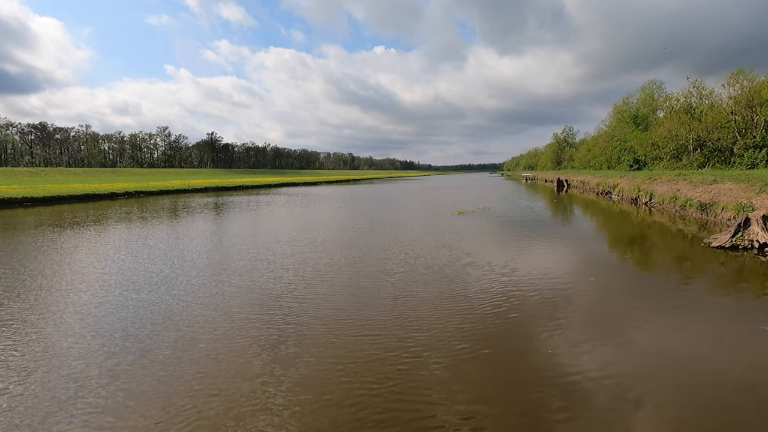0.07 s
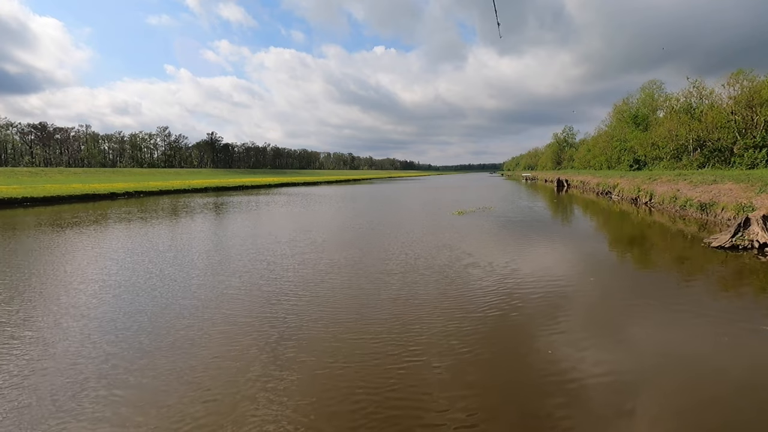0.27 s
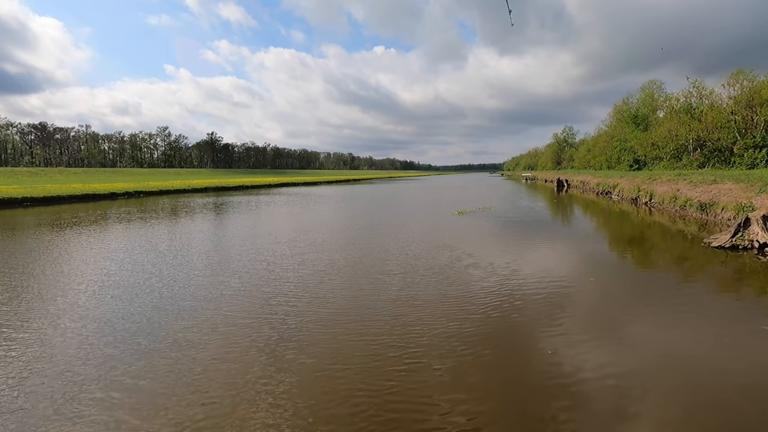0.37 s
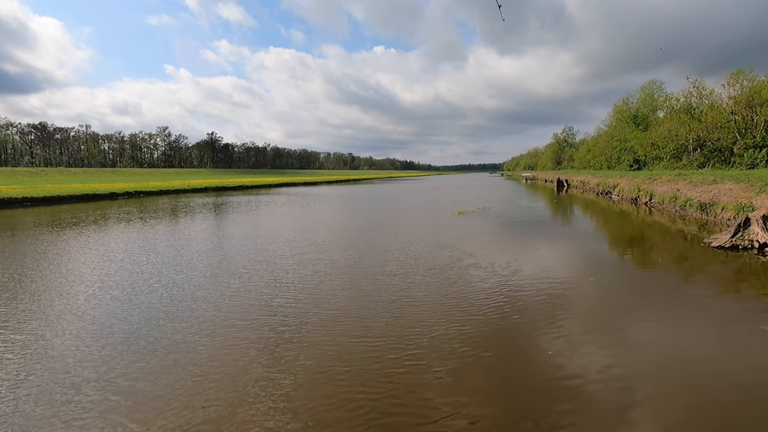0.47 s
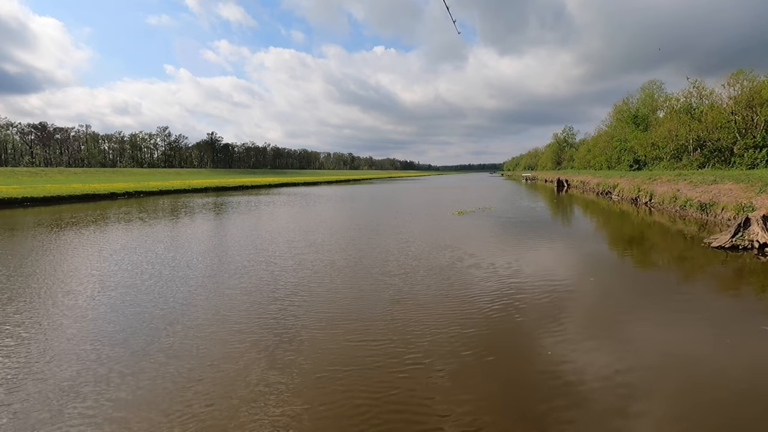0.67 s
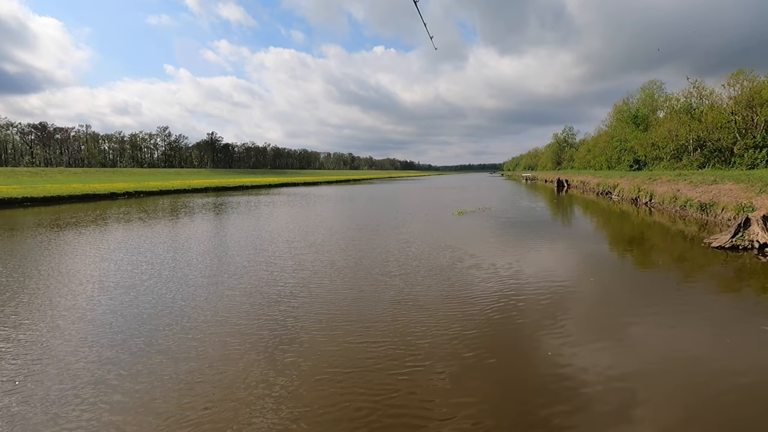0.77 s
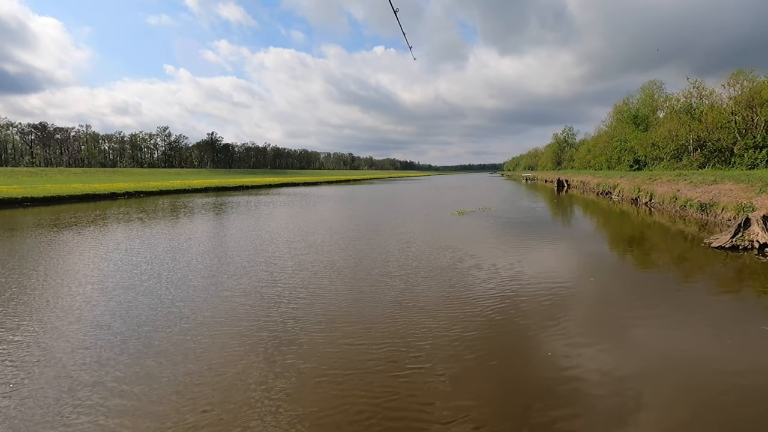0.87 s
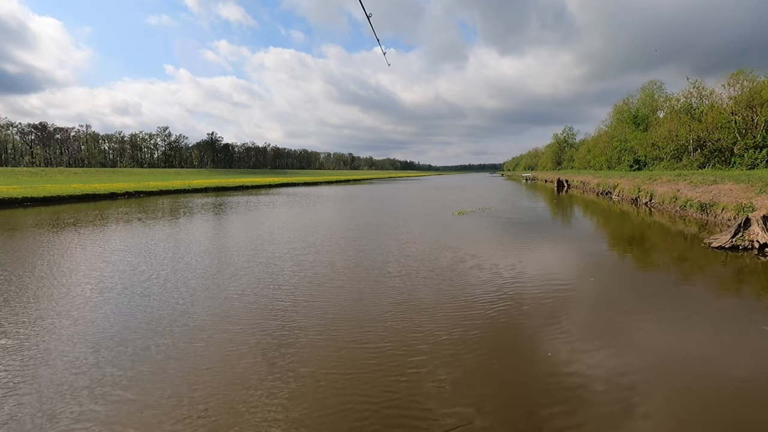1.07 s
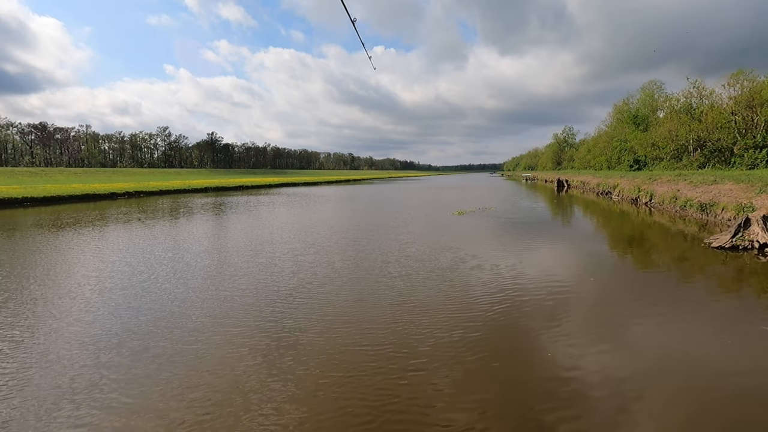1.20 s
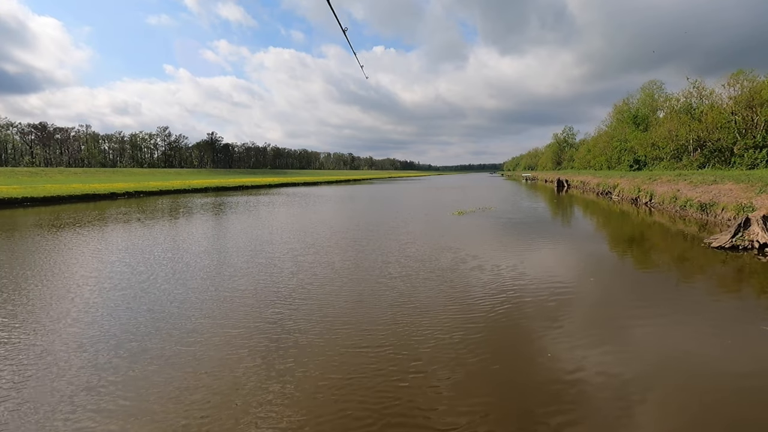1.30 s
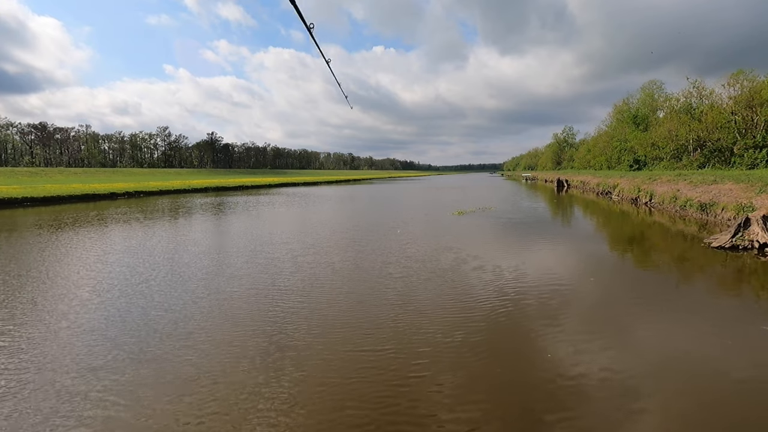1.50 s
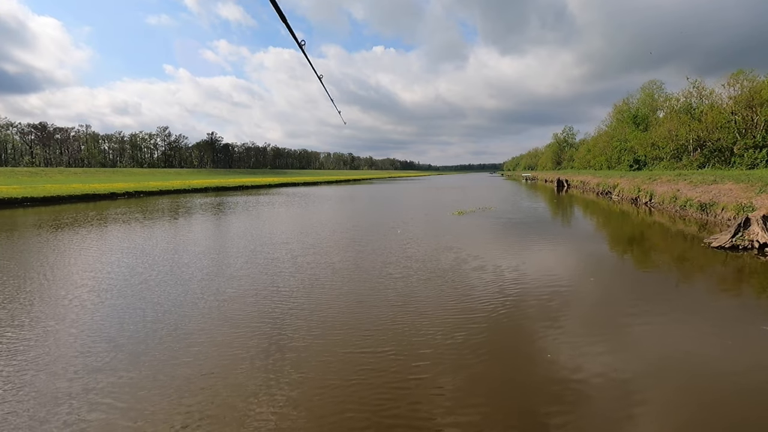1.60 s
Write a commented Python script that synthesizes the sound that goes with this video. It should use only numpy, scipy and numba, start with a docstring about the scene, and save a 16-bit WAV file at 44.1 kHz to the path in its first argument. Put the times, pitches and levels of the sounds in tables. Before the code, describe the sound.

A fishing rod is cast with a quick whoosh, sharp reel clicks and line rattling out, outdoors.

```python
"""By a calm river, a spinning rod is cast close to a body-worn microphone with two ports.
The rod whooshes as noise and tones that follow its speed; the line snaps free in sharp clicks that ring the reel,
then rattles through the guides as streams of small knocks, ever more softly. The arm stops with a dull thump and
a rustle of filtered noise. Water laps as noise and tiny sine bubbles, a far bird whistles in gliding sines,
and a light wind rumbles as low noise under a faint hiss of open air."""
import sys
import numpy as np
from scipy import signal
from scipy.fft import rfft, irfft
from scipy.io import wavfile
from numba import njit

SR = 44100
rng = np.random.default_rng(int(sys.argv[2]) if len(sys.argv) > 2 else 0)


def wrap_up_sound(samples):
    """Save the sound to the file named by the first command line argument, as 16-bit audio."""
    columns = np.atleast_2d(samples).T
    # keep every value between -1 and 1, then stretch to whole-number steps
    tamed = np.clip(columns, -1, 1)
    steps = np.round(tamed * 32767).astype(np.int16)
    wavfile.write(sys.argv[1], SR, steps)


N = 72765
T = np.arange(N) / SR  # time of each sample in seconds

# Hiss of open air. Each row: frequency in Hz, relative level in dB.
AIR_COLOUR = [(100, -5), (400, -7.5), (650, -7.5), (1050, -7.5), (1600, -12.5), (2400, -11.5),
              (3200, -22.5), (4500, -24), (6000, -12), (7200, -30), (8500, -13), (10000, -33), (12200, -30),
              (14000, -53)]
AIR_DB = -56.5
# Rumble of wind. Each row: frequency in Hz, relative level in dB.
WIND_COLOUR = [(10, -12.5), (28, 3.5), (50, -3), (75, -9), (110, -14), (165, -14.5), (250, -23.5),
               (400, -35), (700, -58), (4000, -82)]
# Rise and fall of the wind. Each row: time in seconds, level in dB.
WIND_GUSTS = [(0, -50), (.06, -43.5), (.2, -45.5), (.29, -45), (.38, -52.5), (.5, -46.5), (.57, -49.5),
              (.74, -46), (.8, -53.5), (.95, -49), (1.08, -57), (1.2, -58), (1.3, -48), (1.42, -63),
              (1.57, -51)]

# Whistles of a far bird. Each row: start in seconds, length in seconds,
# pitch at the start, middle and end in Hz, level in dB.
BIRD_WHISTLES = [(.945, .085, 1900, 2280, 2600, -57), (1.092, .073, 2900, 2960, 3150, -55.5),
                 (1.52, .098, 2350, 1990, 2750, -56)]

# Single bubbles at the bank. Each row: start in seconds, pitch in Hz, level in dB, fading time in seconds,
# climb of the pitch during one fading time (as a share of the pitch).
BANK_BUBBLES = [(0.47, 614.5, -43, 0.0057, 0.049), (1.123, 590, -47, 0.011, 0.01),
                (1.146, 570, -50, 0.012, 0), (1.197, 1053, -49.5, .009, .17),
                (1.229, 678, -47, 0.013, 0.14), (1.242, 940, -42.5, 0.008, 0.09),
                (1.256, 1007, -48, 0.011, 0.034), (1.279, 1506, -46.5, 0.005, 0.069),
                (1.316, 1200, -53, 0.0094, .06), (1.392, 545, -42.5, 0.0073, .05),
                (1.432, 598, -44.5, 0.006, 0.084), (1.51, 2430, -43, 0.0027, 0.18)]
# Lapping of small waves. Each row: time in seconds, level in dB before the wash and fizz trims.
LAPPING = [(0, -54), (.9, -62), (1.2, -59), (1.35, -57.5), (1.65, -59)]
WASH_HZ, WASH_WIDTH_HZ, WASH_DB = 179, 160, -1
FIZZ_LOW_HZ, FIZZ_HIGH_HZ = 602.4, 2806
FIZZ_CYCLES, FIZZ_SPREAD_DB, FIZZ_DB = 2.7, 2, -6  # fading time in cycles, spread of sizes, level

# The stop of the arm. Each row: start in seconds, rise in seconds, fading time in seconds,
# thump level in dB, rustle level in dB.
ARM_STOPS = [(0.601, 0.011, 0.018, -39, -45), (.606, 0.025, 0.01, -58, -39.5),
             (0.656, .008, 0.026, -46.5, -53.5)]
THUMP_HZ, THUMP_WIDTH_HZ = 177, 79
# Rustle of the sleeve. Each row: frequency in Hz, relative level in dB.
SLEEVE_COLOUR = [(150, -3), (500, -2.5), (1000, 0), (1700, -3), (2600, 2.5), (4200, -3.5), (6000, -16),
                 (14000, -20)]

# Rush of the swinging rod. Each row: time in seconds, level in dB.
RUSH_LEVEL = [(.08, -62), (.11, -64), (.13, -47), (.148, -41), (.168, -34.5), (.2, -31.5), (.235, -38.5),
              (.27, -59), (.33, -67)]
PEAK_SPEED, PEAK_S, SWING_WIDTH_S = 1.41, .226, .074  # bell of relative speed: height, time, width
# Swirls of air from butt to tip. Each row: centre in Hz at speed 1, width in Hz, relative level in dB.
ROD_EDDIES = [(142, 164, -9), (510, 600, -4), (900, 600, -7.5), (2190, 2000, -6), (5160, 3800, -6)]
# Clear tones of the rod. Each row: pitch in Hz at speed 1, level in dB, start in seconds, length in seconds.
ROD_WHISTLES = [(178.8, -34, .13, 0.066), (572, -35, 0.133, 0.072), (950, -47, 0.155, 0.079),
                (1546, -41, 0.1235, 0.11)]
TONE_WAVER, TONE_WAVER_HZ = 0.42, 90
# The line cutting the air behind the tip. Each row: time in seconds, level in dB.
SWISH_LEVEL = [(.06, -65), (.115, -50), (.16, -44), (.2, -64)]
SWISH_HZ, SWISH_WIDTH_HZ = 4080, 3800

# Clicks of line and reel. Each row: start in seconds, level in dB before the strike and crack trims,
# centre in Hz, width in Hz, fading time of the crack in seconds, drive of the reel's ring in dB before its trim.
LINE_CLICKS = [(0.175, -23, 3760, 450, 0.0054, -13), (0.1925, -10.5, 4280, 8700, 0.002, -1),
               (0.1947, -11, 3160, 4200, 0.0032, -6), (0.2118, -15, 4680, 500, 0.0031, -26),
               (0.2141, -9, 4700, 5400, 0.0018, -9), (0.216, -10, 3250, 6500, 0.0018, -9),
               (0.2283, -16, 5360, 4970, 0.003, -2), (0.232, -17, 5960, 5000, 0.00051, -3),
               (0.256, -15, 4400, 6040, 0.0022, -3), (0.29, -20.5, 6360, 4970, 0.0047, -11),
               (0.3766, -20, 5050, 4950, 0.0012, -18), (0.446, -22, 5540, 5000, 0.00098, -18),
               (0.45, -21, 6200, 1500, 0.00087, -15), (0.4544, -19, 6300, 3000, .0012, -22),
               (.5015, -28, 4940, 4060, 0.002, -10), (1.035, -36, 3200, 3000, .002, -16),
               (1.216, -37.5, 2580, 3000, .002, -18), (1.467, -44, 3860, 4570, 0.005, -21),
               (1.5103, -37, 3580, 6000, 0.00093, -20), (1.5827, -35.5, 4260, 5000, .0005, -14),
               (1.585, -33.5, 3100, 2800, 0.0031, -11), (1.607, -40, 4000, 5100, 0.0009, -10)]
STRIKE_DB, CRACK_DB = -3, -7.5  # trims
# Ringing tones of the reel. Each row: pitch in Hz, relative level in dB, time to fall by 60 dB in seconds.
REEL_TONES = [(1997, -9, .25), (2105, -7, .09), (2850, 0, .025), (3130, -1, .03), (3755, -2, .04),
              (3945, -8, .09), (4600, -5, .06), (4759, -9, .09), (4910, -9, .09), (5760, -7, .07),
              (7570, -13, .1)]
REEL_DB = 4.5  # how freely the reel rings after a strike

# First coils at the spool lip. Each row: frequency in Hz, relative level in dB.
WHIP_COLOUR = [(400, -9.5), (1000, -11), (1500, -7.5), (2100, 15.5), (3700, -36), (6000, 1), (12000, -18)]
WHIP_S, WHIP_FADE_S, WHIP_DB, WHIP_RING_DB = .222, 0.036, -29, -28.5

# The running line. Each row: time in seconds, level in dB.
LINE_LEVEL = [(.205, -32.5), (.22, -27.5), (.258, -30), (.278, -31.5), (.325, -32), (.366, -38.5),
              (.384, -35), (.43, -36), (.475, -41.5), (.51, -35.5), (.545, -42.5), (.62, -42),
              (.715, -48.5), (.79, -45), (.85, -49), (1.0, -49), (1.12, -55.5), (1.385, -53), (1.42, -65),
              (1.48, -60), (1.575, -55), (1.63, -70)]
FAST_S, SLOW_S = 0.4, 0.8  # the line slows between these times
# Ringing of spool and guides under the line. Each row: centre in Hz when slow, width in Hz,
# relative level in dB when fast, relative level in dB when slow.
GUIDE_TONES = [(1004, 187, -11, -13.5), (2340, 240, -24, -12), (2765, 230, -13, -10.5),
               (3554, 150, -13.5, -8), (4286, 430, -6.5, -7), (5015, 400, -3, -5), (5280, 380, -7.5, -5.5),
               (6210, 620, -4, -1), (7330, 640, -6.5, -7), (8960, 3500, -8, -16), (11900, 2300, -17.5, -18)]
GUIDE_SHIFT = 0.039  # the centres lie lower by this share while the line is fast
# Broad rub of the line. Each row: frequency in Hz, relative level in dB.
SCRAPE_COLOUR = [(300, -21), (600, -14), (950, -6.5), (1500, -11.5), (2500, -3.5), (5000, -4), (8000, -7),
                 (10000, -15), (12300, -18), (14000, -22)]
SCRAPE_DB = -2.5  # against the guides
SLAPS_PER_S, SLAP_JITTER, SLAP_SPREAD_DB, SLAP_S = 205, 0.24, 5.5, 0.0014  # SLAP_S is the fading time
TICKS_PER_S, TICK_DB = 110, -6
RUB_SHARE, SCRAPE_RUB, WHIP_RUB = 0.47, 1.02, 0.84  # steady rub against slaps
SHARED_SLAPS = 0.57  # share of the slaps felt by all guides
FLUTTER, FLUTTER_HZ = .17, 45

# The two microphone ports. Each row: frequency in Hz, left minus right in dB, lag of the left in radians.
MIC_PORTS = [(100, -0.5, 0.069), (614, 0.5, 0.56), (1560, 3.5, 0.63), (3060, 1, 0.97), (4560, 2, 0.04),
             (5500, 1, 0), (7200, 6, 0.24), (11500, 4.5, 0.95)]
TOP_HZ = 13300  # where the recorder cuts the treble


def undb(db):
    """Turn decibels into a gain."""
    return 10 ** (np.asarray(db) / 20)


def unit(x):
    """Scale a sound to an average strength (rms) of 1."""
    return x / np.sqrt(np.mean(x ** 2) + 1e-20)


def curve(rows, axis=1):
    """Join one column of a table by straight lines in time."""
    rows = np.array(rows)
    return np.interp(T, rows[:, 0], rows[:, axis])


def noise(side_db, pan_db):
    """Make stereo white noise, partly different at the two ports."""
    mid, side = rng.standard_normal((2, N))
    ears = np.array([[1], [-1]])
    return (mid + ears * undb(side_db) * side) * undb(ears * pan_db / 2)


def colour(x, points):
    """Filter a sound by a table of Hz and dB, then scale it to rms 1."""
    hz, db = np.array(points).T
    f = np.maximum(np.fft.rfftfreq(2 * N, 1 / SR), 1)
    gain = undb(np.interp(np.log(f), np.log(hz), db))
    return unit(irfft(rfft(x, 2 * N) * gain)[..., :N])


@njit
def svf(x, hz, width):
    """Let through a band whose centre may move (a state-variable filter)."""
    y, b, l = np.empty(len(x)), 0., 0.
    for i in range(len(x)):
        g, k = np.tan(np.pi * hz[i] / SR), width / hz[i]
        v = (b + g * (x[i] + 1e-18 - l)) / (1 + g * (g + k))
        b, l, y[i] = 2 * v - b, l + 2 * g * v, k * v
    return y


def band(x, hz, width):
    """Filter each channel twice, for a steeper band."""
    hz, width = np.clip(hz * np.ones(N), 1, SR / 2 - SR / 20), float(width)
    return np.array([svf(svf(channel, hz, width), hz, width) for channel in x])


def burst(start, attack, release):
    """Rise in a straight line, then fade exponentially."""
    rise = np.clip((T - start) / attack, 0, 1)
    return rise * np.exp(-np.maximum(T - start - attack, 0) / release)


def swell(start, length):
    """Fade in, hold, fade out."""
    return np.minimum(2 * np.sin(np.pi * np.clip((T - start) / length, 0, 1)), 1)


def waver(depth, rate_hz):
    """Make a random flutter of level around 1."""
    return 1 + depth * unit(band(rng.standard_normal((1, N)), rate_hz / 2, rate_hz))


def tone(hz):
    """Make a sine that follows a pitch."""
    return np.sin(2 * np.pi * np.cumsum(hz) / SR)


def knocks(rate, spread_db):
    """Make a row of single-sample knocks of uneven spacing and size."""
    gap, size = rng.standard_normal((N // 50, 2)).T
    at = (np.cumsum(np.exp(SLAP_JITTER * gap)) * SR / rate).astype(int)
    strength = undb(spread_db * np.minimum(size, 1))
    inside = at < N
    return np.bincount(at[inside], strength[inside], N)


def slaps(rub):
    """Loops of line slap at an uneven rate, each fading quickly, over a steady rub."""
    hits = knocks(SLAPS_PER_S, SLAP_SPREAD_DB)
    fading = signal.lfilter([1], [1, -np.exp(-1 / (SLAP_S * SR))], hits)
    return unit(rub + unit(fading))


def reel(x):
    """A knock on the reel sets off its fading tones; the ring has unit energy."""
    t = T[:N // 4]
    ring = 0
    for hz, db, t60 in REEL_TONES:
        ring = ring + undb(db - 60 * t / t60) * np.sin(2 * np.pi * hz * t)
    ring = ring / np.linalg.norm(ring)
    return signal.fftconvolve(x, ring[None])[:, :N]


def outdoors():
    """Open air hisses faintly, and wind on the microphone makes a low rumble that comes and goes."""
    air = undb(AIR_DB) * colour(noise(side_db=-6.0, pan_db=-1.5), AIR_COLOUR)
    wind = undb(curve(WIND_GUSTS)) * colour(noise(side_db=-9.0, pan_db=1), WIND_COLOUR)
    return air + wind


def bird():
    """A far bird gives thin gliding whistles with a wavering level."""
    whistles = 0
    for start, length, first, middle, last, db in BIRD_WHISTLES:
        progress = np.clip((T - start) / length, 0, 1)
        glide = np.polyfit([0, .5, 1], [first, middle, last], 2)  # a smooth bend through three pitches
        whistles = whistles + undb(db) * swell(start, length) * tone(np.polyval(glide, progress))
    return whistles * waver(depth=.2, rate_hz=70)


def water():
    """Bubbles ring, most of them rising in pitch, over the wash and fizz of small waves."""
    bubbles = 0
    for start, hz, db, length, rise in BANK_BUBBLES:
        pitch = hz * (1 + rise * np.clip((T - start) / length, 0, 2))
        bubbles = bubbles + undb(db) * burst(start, 0.0022, length) * tone(pitch)
    fizz = 0
    for when, pitch, strength in rng.random(size=(130, 3)):  # tiny bubbles at random times
        hz = FIZZ_LOW_HZ * (FIZZ_HIGH_HZ / FIZZ_LOW_HZ) ** pitch
        level = undb(-FIZZ_SPREAD_DB * np.log(1 - .95 * strength))  # few are loud
        fizz = fizz + level * burst(when * N / SR, .001, FIZZ_CYCLES / hz) * np.sin(2 * np.pi * hz * T)
    wash = unit(band(noise(side_db=-12, pan_db=-0.5), WASH_HZ, WASH_WIDTH_HZ))
    waves = undb(FIZZ_DB) * unit(fizz) + undb(WASH_DB) * wash
    return bubbles * waver(depth=0.18, rate_hz=120) + undb(curve(LAPPING)) * waves


def arm():
    """The rod butt comes to rest with a soft low thud while the sleeve brushes the jacket."""
    thud = unit(band(noise(side_db=-31, pan_db=1), THUMP_HZ, THUMP_WIDTH_HZ))
    cloth = colour(noise(side_db=-5, pan_db=6.5), SLEEVE_COLOUR)
    stops = 0
    for start, attack, release, thump_db, rustle_db in ARM_STOPS:
        both = undb(thump_db) * thud + undb(rustle_db) * cloth
        stops = stops + both * burst(start, attack, release)
    return stops


def whoosh():
    """Each thickness of the rod sheds swirls of air whose pitch follows the speed; the line swishes behind."""
    speed = PEAK_SPEED * np.exp(-((T - PEAK_S) / SWING_WIDTH_S) ** 2 / 2)
    rush = 0
    for hz, width, db in ROD_EDDIES:
        centre = hz * np.maximum(speed, .5)
        rush = rush + undb(db) * unit(band(noise(side_db=-23, pan_db=.5), centre, width))
    swinging = (T > RUSH_LEVEL[0][0]) * (T < RUSH_LEVEL[-1][0])
    rush = unit(rush) * undb(curve(RUSH_LEVEL)) * swinging
    tones = 0
    for hz, db, start, length in ROD_WHISTLES:
        wavering = tone(hz * speed) * waver(TONE_WAVER, TONE_WAVER_HZ)
        tones = tones + undb(db) * wavering * swell(start, length) ** 2
    swish = unit(band(noise(side_db=-5.0, pan_db=1.5), SWISH_HZ, SWISH_WIDTH_HZ))
    swish = swish * undb(curve(SWISH_LEVEL)) * (T < SWISH_LEVEL[-1][0])
    return tones + swish + rush


def clicks():
    """The line leaves the finger and hits the tackle: a hard strike that rings the reel, and a short crack."""
    cracks, blows = 0, 0
    for start, db, hz, width, length, ring_db in LINE_CLICKS:
        strike = band(signal.unit_impulse(N, int(start * SR))[None], hz, width)
        strike = undb(db + STRIKE_DB) * strike / np.abs(strike).max()
        crack = unit(band(noise(side_db=-3.5, pan_db=-8.0), hz, width))
        crack = undb(db + CRACK_DB) * crack * burst(start, 0.00038, length)
        cracks = cracks + strike + crack
        blows = blows + strike * undb(ring_db)
    return cracks + undb(REEL_DB) * reel(blows)


def spool():
    """The first coils whip the spool lip and keep the reel ringing."""
    coils = slaps(WHIP_RUB) * noise(side_db=-14.0, pan_db=0.0)
    whip = undb(WHIP_DB) * colour(coils, WHIP_COLOUR)
    ringing = undb(WHIP_RING_DB) * unit(reel(coils))
    return (whip + ringing) * burst(WHIP_S, 0.0019, WHIP_FADE_S)


def line():
    """The line rattles through the guides in soft slaps and hard ticks, duller and more fluttering as it slows."""
    shared = slaps(RUB_SHARE)
    slow = np.clip((T - FAST_S) / (SLOW_S - FAST_S), 0, 1)  # 0 is fast, 1 is slow
    ticks = undb(TICK_DB) * unit(knocks(TICKS_PER_S, SLAP_SPREAD_DB)) * (1 - slow / 2)
    guides = 0
    for hz, width, fast_db, slow_db in GUIDE_TONES:
        contact = SHARED_SLAPS * shared + (1 - SHARED_SLAPS) * slaps(RUB_SHARE)
        drive = ticks + contact * noise(side_db=-42, pan_db=-0.5)
        ring = band(drive, hz * (1 - GUIDE_SHIFT * (1 - slow)), width)
        guides = guides + unit(ring) * undb(fast_db + slow * (slow_db - fast_db))
    rubbing = slaps(SCRAPE_RUB) * noise(side_db=-14.5, pan_db=-1.0)
    scrape = colour(ticks / 2 + rubbing, SCRAPE_COLOUR)
    rattle = unit(unit(guides) + undb(SCRAPE_DB) * scrape)
    flutter = waver(FLUTTER * slow, FLUTTER_HZ)
    return rattle * flutter * undb(curve(LINE_LEVEL)) * (T > LINE_LEVEL[0][0])


def scene():
    """Add the cast and the river around it."""
    cast = whoosh() + clicks() + spool() + line() + arm()
    river = water() + bird() + outdoors()
    return cast + river


def record(dry):
    """The two ports differ in level and phase; the recorder cuts the top of the treble."""
    hz, pan_db, lag = np.array(MIC_PORTS).T
    f = np.fft.rfftfreq(2 * N, 1 / SR)
    ears = np.array([[1], [-1]]) / 2  # half of each difference goes to each side
    level = undb(ears * np.interp(f, hz, pan_db))
    phase = np.exp(-1j * ears * np.interp(f, hz, lag))
    heard = irfft(rfft(dry, 2 * N) * level * phase)[:, :N]
    return signal.sosfilt(signal.butter(16, TOP_HZ, fs=SR, output="sos"), heard)


dry = scene()
out = record(dry)
wrap_up_sound(out)
```